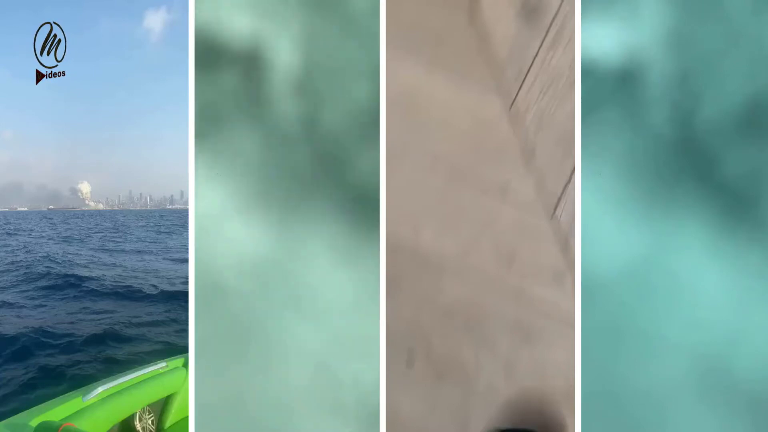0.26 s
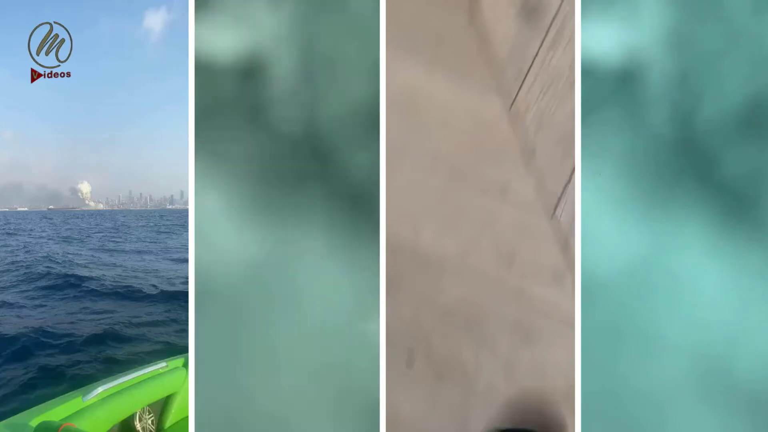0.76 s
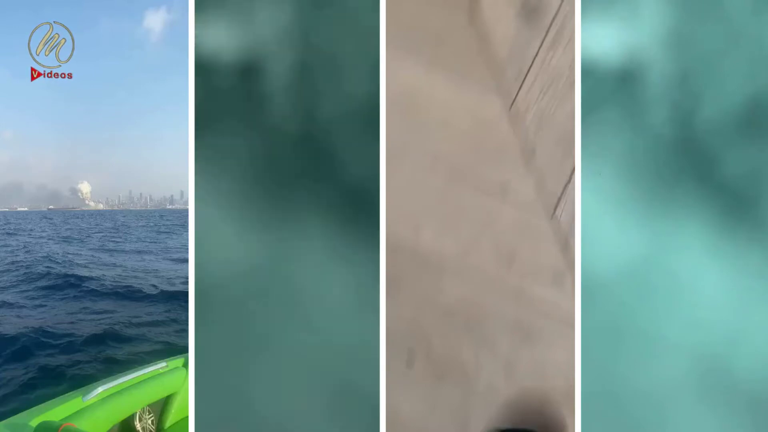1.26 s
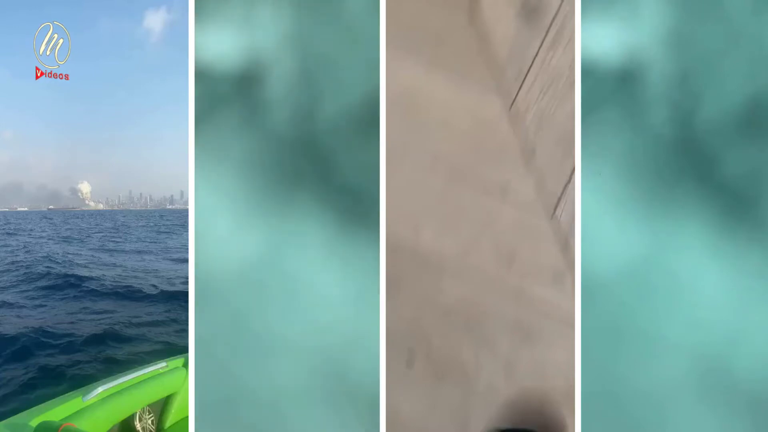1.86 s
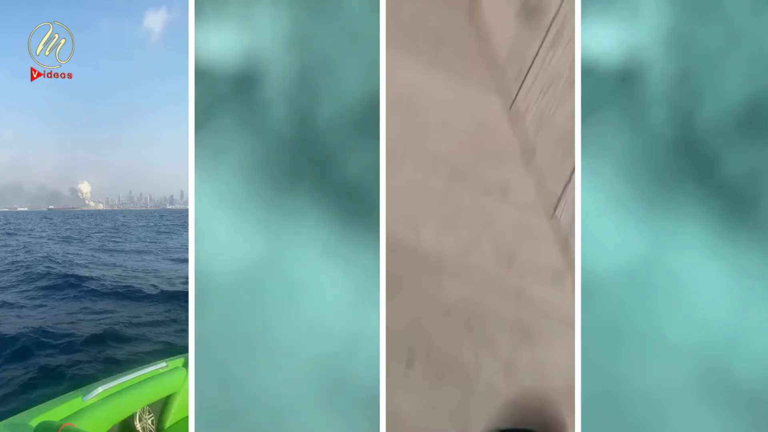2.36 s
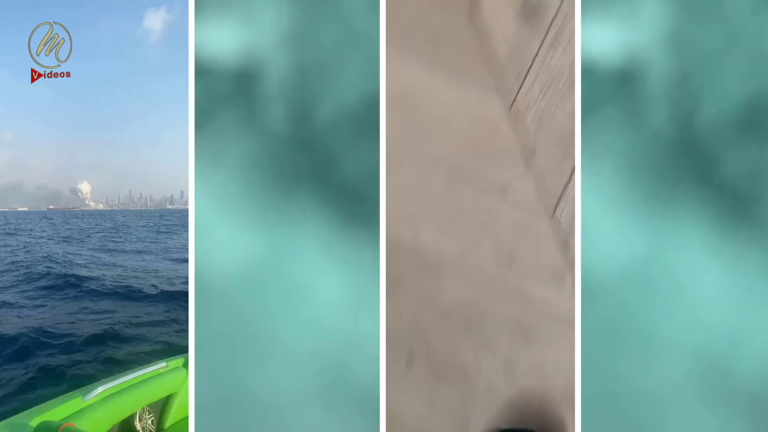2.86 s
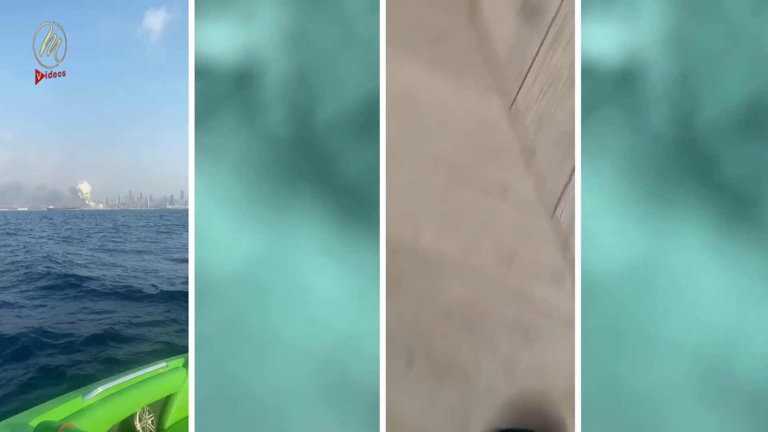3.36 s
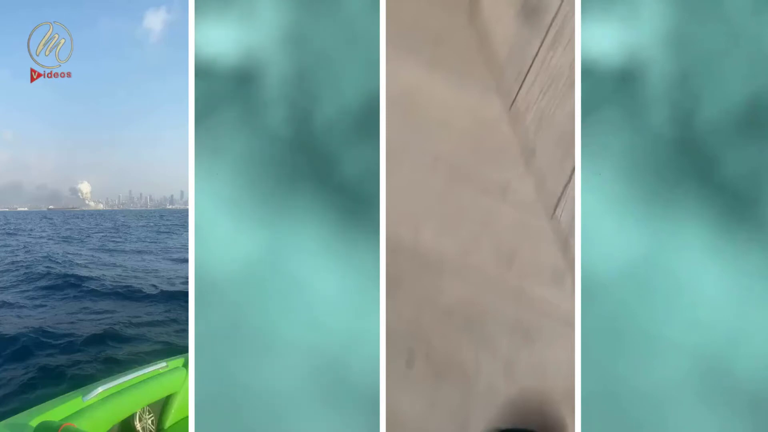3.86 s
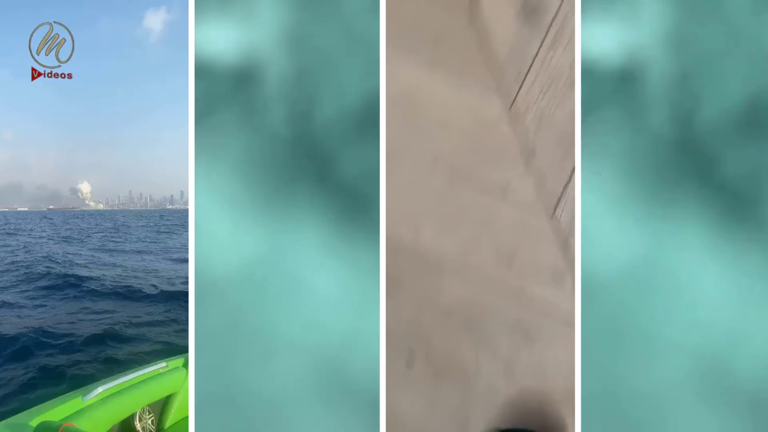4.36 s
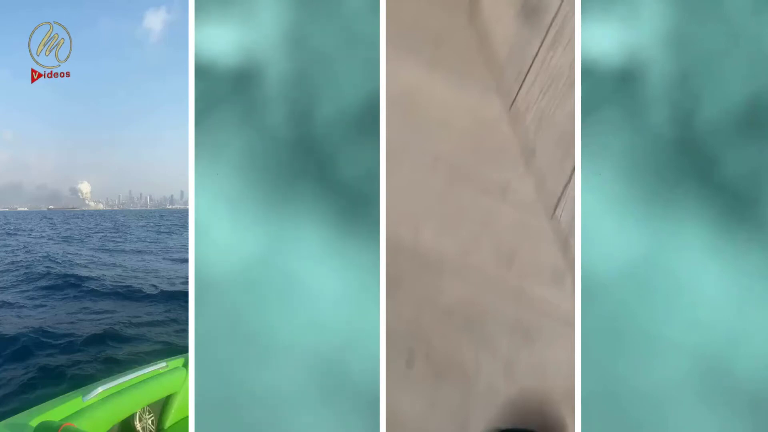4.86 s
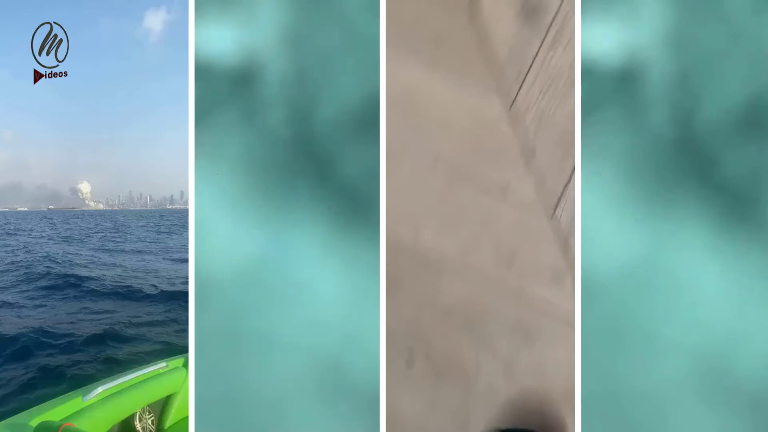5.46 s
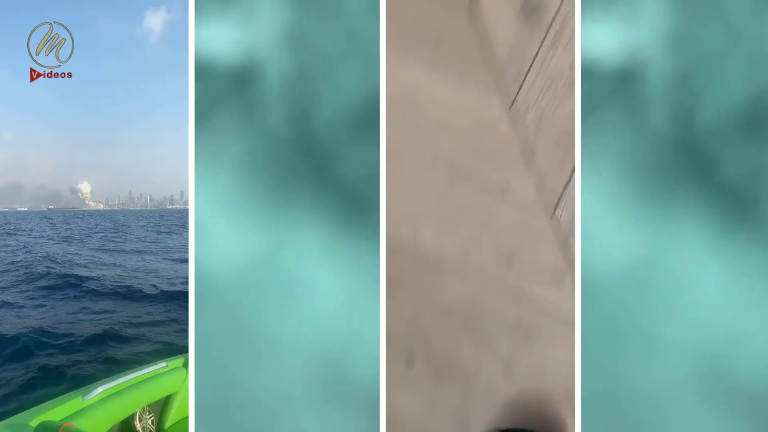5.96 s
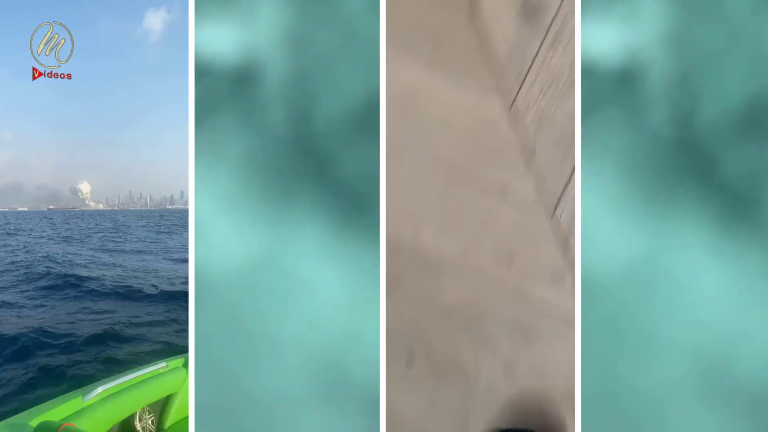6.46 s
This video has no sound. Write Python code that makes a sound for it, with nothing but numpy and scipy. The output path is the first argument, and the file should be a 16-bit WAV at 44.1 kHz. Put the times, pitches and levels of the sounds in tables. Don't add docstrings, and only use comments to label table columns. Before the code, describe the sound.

A huge distant explosion's deep rumbling roar rolls and slowly fades outdoors, with early sharp thuds, clattering debris, a faint scrape and late glass tinkle.

```python
import sys
import numpy as np
from scipy import signal
from scipy.fft import rfft, irfft, dct, next_fast_len
from scipy.io import wavfile
from scipy.ndimage import uniform_filter1d

SR = 44100
rng = np.random.default_rng(int(sys.argv[2]) if len(sys.argv) > 2 else 0)


def file_out(sig):
    cols = np.atleast_2d(sig).T
    lim = np.clip(cols, -1, 1)
    pcm = np.round(lim * 32767).astype(np.int16)
    wavfile.write(sys.argv[1], SR, pcm)


def boost_factor(decibels):
    exponent = np.asarray(decibels, float) / 20
    return 10 ** exponent


N = 296855

# pitch_hz, level_db
RUMBLE = [(12, -36), (20, -30), (29, -35), (46, -0.5), (75, 2), (244, -8.5), (289, -12), (322, -16.5),
          (438, -21.5), (496, -27), (800, -39), (1040, -42), (1760, -120)]
# pitch_hz, level_db
DIFFUSE = [(30, -40), (100, -22.5), (200, -17), (400, -7), (800, -5.5)]
# pitch_hz, level_db
ROAR = [(130, -25), (250, 1.5), (380, 0), (500, -1), (750, -8), (970, -10), (1440, -6.5), (1780, -15),
        (2100, -17), (2800, -39.5), (3600, -58)]
# pitch_hz, level_db
ROAR_APART = [(260, -39.5), (450, -4), (486, 0.5), (650, -3.5), (830, -3.5), (1510, -9.5), (2420, -20),
              (2800, -21.5), (3640, -42.5), (6160, -120)]
# pitch_hz, level_db
EARLY = [(350, -24.5), (600, -0.5), (850, 1), (1300, -9), (1800, -3.5), (2300, -5), (3200, -14),
         (4500, -29.5)]
# pitch_hz, level_db
HISS = [(1500, -28), (2300, 6), (2700, -2.5), (3300, 2), (4000, -2.5), (4350, -1.5), (4520, 2),
        (4700, -3.5), (5800, -5.5), (6600, -11.5), (8000, -31.5)]
# pitch_hz, level_db
FIZZ = [(4500, -29), (5800, -15.5), (6600, -6.5), (7400, -2), (8500, -3), (9500, -7), (10500, -6),
        (11600, -12), (12000, -65)]
# pitch_hz, level_db
KNOCK = [(300, -16.5), (700, -11.5), (1400, -2), (2200, 4), (3200, -29.5)]

# first_db, last_db, time_constant_s
SINK_RUMBLE = (-16, -27., 1.92)
SINK_ROAR = (-23, -52, 2.51)
SINK_EARLY = (-30, -70.5, 1.5)
SINK_HISS = (-34.5, -83.5, 5.11)
SINK_FIZZ = (-42, -84.5, 3.4)
# centre_s, half_length_s, lift_db
SWELLS = [(0.104, 0.12, -2.5), (0.369, 0.23, 1), (0.658, 0.063, -3), (0.776, 0.063, 0.5), (0.89, 0.022, -9),
          (1.05, 0.19, 1.5), (1.341, 0.044, -4.5), (1.486, 0.03, -4.5), (1.696, 0.13, 3),
          (2.024, 0.12, 2.5), (2.145, 0.049, -3.5), (2.305, .04, 3), (2.412, 0.042, 5), (2.46, 0.074, -2),
          (2.992, 0.06, 3), (3.078, 0.056, -0.5), (3.112, 0.018, 2), (3.273, 0.0094, -1.5),
          (3.477, 0.091, 3), (3.607, 0.013, 9), (3.722, 0.054, -0.5), (3.791, 0.044, 6.5),
          (4.037, 0.27, 4.5), (4.282, 0.05, 5), (4.484, 0.027, 6.5), (4.869, 0.084, 2), (5.664, 0.054, -3),
          (5.752, 0.088, 3), (5.953, .04, 1.5), (6.724, 0.085, 1.5)]
# centre_s, half_length_s, lift_db, extra_treble_db
WAVES = [(0.001, 0.1, 3, 1), (0.109, 0.17, -5, 18.5), (0.316, 0.1, -2, 6.5), (0.482, 0.042, 0.5, -2.5),
         (0.795, 0.02, 2.5, 2), (0.839, 0.036, -6.5, 2.5), (1.028, 0.18, 7, -4), (1.165, 0.04, 5.5, 0.5),
         (1.614, 0.11, 1.5, -8), (1.862, 0.13, 3, -12), (1.995, 0.072, 4.5, 3), (2.102, 0.072, 1.5, 7.5),
         (2.55, 0.11, -2, -5.5), (2.645, 0.17, -2, 12), (2.768, 0.082, -4.5, 1.5), (3.044, 0.42, 5, 2),
         (2.95, 0.044, 0.5, 3.5), (3.312, 0.15, 2.5, 8), (3.845, 0.2, 6.5, -5), (4.115, 0.11, 4.5, 5.5),
         (4.548, 0.13, 5, -8.5), (4.644, 0.072, 0.5, 15.5), (4.927, 0.9, 0, -5.5), (5.202, 0.034, 4, 0),
         (5.31, 0.25, -1.5, 13.5), (5.518, 0.13, 2, -1.5), (5.717, 0.037, 2, -1), (5.97, 0.08, 3, -11),
         (6.37, 0.14, 2, -3), (6.74, 0.013, 17, 7)]
TAKES_ROAR = (1, 0.022)
TAKES_HISS = (1.17, 0.46)
TAKES_FIZZ = (1, 0.7)

# start_s, level_db, pitch_hz
BOOMS = [(0.121, -7, 75.4), (0.31, -2, 78), (0.345, -12, 89), (0.376, -12, 130), (0.424, -26, 121),
         (0.462, -17.5, 113), (0.514, -16, 80), (0.68, -13.5, 59), (0.724, -7.5, 123), (0.78, -5.5, 86.4),
         (0.82, -10, 96.6), (0.883, -15, 148), (1.088, -14.5, 58), (1.619, -7, 68.6), (1.707, -11, 141),
         (2.024, -13, 61.4), (2.292, -11, 95), (2.324, -4, 112.4), (2.376, -6, 61.3), (2.55, -15, 130),
         (3.482, -32, 86), (3.574, -12, 90.5), (3.767, -11.5, 105), (3.933, -19, 118), (4.049, -11.5, 94),
         (4.27, -13.5, 60), (4.382, -13, 82), (4.478, -18.5, 85), (4.559, -20, 154), (4.659, -19, 138),
         (4.95, -24.5, 180), (5.011, -17, 117), (5.585, -18.5, 100), (5.683, -28, 154), (6.544, -25, 139.5),
         (6.687, -13.5, 83)]
# start_s, level_db, pitch_hz
THUDS = [(0.026, -3.5, 423), (0.2, -9, 306), (0.247, -30, 328), (0.281, -2, 540), (0.347, 1.5, 348),
         (0.45, -1.5, 334), (0.521, -14, 360), (0.591, -17, 355), (0.616, -4.5, 292), (0.678, -12, 305),
         (0.718, -16, 323), (0.751, -5.5, 322), (0.809, -8, 302), (0.838, -13, 560), (0.938, -32, 303.6),
         (1.011, -29, 357), (1.026, -4.5, 393), (1.146, -26, 398), (1.26, -7.5, 345.5)]
# start_s, level_db, t60_s, knock_db, fizz_db
CLATTER = [(0.024, -2, 0.024, -18, -11), (0.4448, -12, 0.029, -13, -11), (0.4934, -12.5, 0.03, 11, -11.5),
           (0.5214, -50, 0.025, 10, -33), (0.6724, -33, 0.046, 3, -13), (0.6933, -23, 0.03, 8, -20),
           (0.7165, -33, 0.015, -1, -13), (0.733, -30, 0.02, 3, -11), (0.7487, -35, 0.022, 1.5, -17),
           (0.7706, -18, 0.056, 2.5, -14), (0.817, -42, 0.017, -5, -13), (0.8395, -30, 0.046, 14, -8),
           (1.038, -39, 0.16, 3, 4.5), (1.137, -15, 0.13, 10.5, -24), (1.611, -27.5, 0.088, 15.5, -16),
           (1.9854, -38, 0.034, 2, -4), (2.297, -41, 0.099, -2, -10), (2.6154, -41, 0.079, -4, 1),
           (2.918, -37.5, 0.11, -6, -27), (3.2966, -27.5, 0.038, -4, -19), (4.1103, -56, 0.06, 8, -23),
           (4.62, -35.5, 0.053, 9, -15), (4.632, -38, 0.059, 5, -12), (5.2025, -44, 0.071, 3, -23),
           (5.252, -53, 0.22, -11, -3), (5.52, -57, 0.05, -5, 6), (5.8154, -60, 0.061, 14, -13),
           (5.857, -53, 0.06, 8, -22), (6.331, -54.5, 0.2, 6, -3), (6.6194, -58, 0.062, 10, -6)]
# start_s, level_db, pitch_hz, t60_s
CHINKS = [(.022, -30, 7050, 0.046), (.022, -32, 4200, .05), (.055, -20, 2140, .06), (.44, -32, 6450, .04),
          (.488, -33, 8020, 0.056), (.488, -31, 4340, .05), (.688, -30, 2970, .04), (.77, -29, 3020, .04),
          (1.03, -20, 724, .07), (1.985, -28, 1540, 0.068), (4.625, -46, 6050, .05),
          (1.138, -19, 1890, 0.041), (3.24, -42, 2425, 0.18), (3.975, -52, 9430, 0.15),
          (4.108, -29, 2084, 0.075), (5.205, -43, 900, 0.091), (5.201, -51, 4600, 0.044),
          (5.204, -47, 3160, 0.034), (5.53, -68, 3800, 0.15)]
# (pitch_hz, level_db)
GLASS = [
    (5.51, 0.38, -1.5, [(6110, -83), (6422, -100), (6998, -82), (7510, -97), (7725, -85), (8306, -84), (8603, -86), (8942, -90), (9114, -85), (9335, -93), (9808, -87), (10691, -99), (10977, -89), (11149, -99)]),
    (6.08, 0.11, -1.2, [(6476, -83), (6950, -95), (7843, -100), (7903, -83), (8156, -85), (8775, -103)]),
]
# time_s, level_db
SCRAPE = [
    (2.75, -86.5),
    (2.88, -52),
    (3.1, -49),
    (3.3, -57),
    (3.55, -60.5),
    (3.7, -84.5),
]

# pitch_hz, left_lead_rad, likeness (0-1)
PORTS = [(1890, 0.76, 0.94), (2650, 4.3, 0), (3564, 2.11, .5), (4323, 1.74, 1), (4600, 3.1, 0.5),
         (5000, 3.5, 0.91), (5460, 3.31, 0.79), (6100, 4.46, 0.71), (6300, 4.6, .6), (6700, 5.3, .65),
         (6950, 6.2, .96), (9500, 6.35, .94), (10480, 8.4, 0.2), (11040, 9.16, 0.9)]
# time_s, share (0-1)
FOCUS = [
    (0, 0.53),
    (.25, 0.14),
    (.32, 0.2),
    (2.8, 0.1),
    (2.88, 0.1),
    (3.269, 0.4),
    (3.33, 0),
]
# time_s, share (0-1)
OPPOSED = [
    (2.818, 0.3),
    (2.87, 0.18),
    (3.25, 0.3),
    (3.29, 0),
]
# pitch_hz, left_lead_rad
EDGE_ON = [(1890, .3), (2240, 3.6), (2580, 3.2), (3700, 3.1), (4390, 2.2), (4740, 3.1), (6200, 3.4),
           (6980, 6.2), (9910, 6.3), (11300, 9.6)]
# pitch_hz, left_over_right_db
LEAN = [(60, -0.5), (130, -1), (270, -4), (560, -1.5), (1190, -1.5), (2510, -4.5), (5290, 3), (11200, -2)]
# start_s, end_s
GAP = (.8035, .8124)

# pitch_hz, depth_db
STREAKS = [(900, 0), (1800, 2.5), (2800, 4), (4500, 4.5), (7000, 3), (11000, 3.5)]
# pitch_hz, level_db
STARVE = [(200, -36), (800, -25), (1600, -24), (2200, -16), (2700, -10), (4000, -9), (5200, -8), (6500, -7),
          (7500, -8.5), (9000, -5.5), (10300, -5), (11500, -2)]
THINNING_BANDS = [0, 96, 108, 120, 132, 144, 160, 176, 196, 216, 240, 264, 292, *range(320, 1024, 32)]
SHARP = [
    .33,
    .45,
    .5,
    .735,
    .755,
    .79,
    .825,
    .845,
    5.205,
]
# centre_s, half_length_s, depth_db
THRIFT = [
    (.13, 0.26, 4),
    (.6, 0.082, 0.5),
    (1.02, 0.22, 2),
    (1.25, 0.099, 1),
    (3.05, 0.23, 7),
]
# pitch_hz, share (ratio)
THRIFT_SHARE = [(2450, 0), (2560, 1.8), (3100, 1.4), (3700, .6), (4600, .4), (5600, 1), (6250, 1.4),
                (6300, 0)]


def evened(x):
    return x / np.sqrt(np.mean(x ** 2) + 1e-20)


def smoothed(x, width):
    return uniform_filter1d(uniform_filter1d(x, width), width)


def read(points, hz):
    f, value = np.transpose(points)
    return np.interp(np.log(hz + 1), np.log(f + 1), value)


def add(mix, s, sound):
    part = mix[..., round(s * SR):][..., :sound.shape[-1]]
    part += sound[..., :part.shape[-1]]


def bumps(rows):
    out = np.zeros((len(rows[0]) - 2, N))
    for s, half, *db in rows:
        at = slice(max(round((s - half) * SR), 0), round((s + half) * SR))
        hump = np.cos(np.pi / 2 * (np.arange(N)[at] / SR - s) / half) ** 2
        add(out, at.start / SR, np.outer(db, hump))
    return out


def level(sink, humps, takes):
    first_db, last_db, seconds = sink
    sinking_db = last_db + (first_db - last_db) * np.exp(-np.arange(N) / SR / seconds)
    return boost_factor(sinking_db + np.dot(takes, bumps(humps)))


def flutter(depth_db, seconds):
    noise = rng.standard_normal(N)
    return boost_factor(depth_db * evened(smoothed(noise, max(int(seconds * SR), 2))))


def patchy(x, depth_db, bins, frames):
    z = signal.stft(x, nperseg=512)[2]
    noise = rng.standard_normal(z.shape[-2:])
    field = uniform_filter1d(noise, max(int(bins), 1), axis=0)
    field = evened(uniform_filter1d(field, max(int(frames), 1), axis=1))
    return signal.istft(z * boost_factor(depth_db * field), nperseg=512)[1][..., :N]


def echoes(per_s, spread_db):
    arrive, sign, big = rng.random((3, N), np.float32)
    at = np.flatnonzero(arrive < per_s / SR)
    size_db = spread_db * np.minimum(-np.log(1 - big[at]), 5)
    out = np.zeros(N)
    out[at] = np.sign(sign[at] - .5) * boost_factor(size_db)
    return out


def coloured(x, *spectra):
    hz = abs(np.fft.fftfreq(16384, 1 / SR))
    gain_db = np.maximum(sum(read(s, hz) for s in spectra), -100)
    log_gain = np.log(boost_factor(gain_db))
    taps = np.fft.ifft(np.exp(np.conj(signal.hilbert(log_gain)))).real[:6000]
    return signal.oaconvolve(x, taps)[:len(x)]


def ports(alike, apart):
    return np.array([alike + apart, alike - apart])


def port_pair(x, other):
    size, t = next_fast_len(N), np.arange(N) / SR
    hz = np.fft.rfftfreq(size, 1 / SR)
    f, lead, same = np.transpose(PORTS)
    same = np.clip(np.interp(hz, f, same), 0, 1)
    left = rfft(x, size)
    turned = np.exp(-1j * np.interp(hz, f, lead)) * left
    mixed = same * turned + np.sqrt(1 - same ** 2) * rfft(other, size)
    focus = np.clip(np.interp(t, *np.transpose(FOCUS)), 0, 1)
    right = focus * irfft(turned, size)[:N] + (1 - focus) * irfft(mixed, size)[:N]
    edge_on = irfft(np.exp(-1j * np.interp(hz, *np.transpose(EDGE_ON))) * left, size)[:N]
    opposed = np.clip(np.interp(t, *np.transpose(OPPOSED)), 0, 1)
    return np.array([x, opposed * edge_on + (1 - opposed) * right])


def rattle(spectrum, per_s, spread_db):
    return port_pair(*(evened(coloured(echoes(per_s, spread_db), spectrum)) for _ in range(2)))


def hiss(waver):
    coarse = rattle(HISS, per_s=15000, spread_db=4.0) * level(SINK_HISS, WAVES, TAKES_HISS) * boost_factor(5.5)
    fine = rattle(FIZZ, per_s=13000, spread_db=3.5) * level(SINK_FIZZ, WAVES, TAKES_FIZZ) * boost_factor(0.5)
    return patchy(coarse + fine, depth_db=3.0, bins=3.5, frames=9.5) * waver


def scrape(hz=4420., width_hz=200.):
    t = np.arange(N) / SR
    grit = uniform_filter1d(rng.standard_normal((2, N)), max(int(SR / width_hz), 2), axis=1)
    tone = evened(grit[0] * np.cos(2 * np.pi * hz * t) + grit[1] * np.sin(2 * np.pi * hz * t))
    return tone * boost_factor(np.interp(t, *np.transpose(SCRAPE))) * [[1], [-.6]]


def shards():
    out, t = np.zeros(N), np.arange(SR // 2) / SR
    for s, db, hz, t60 in CHINKS:
        decay = boost_factor(db - 60 * t / max(t60, .02))
        add(out, s, decay * np.sin(2 * np.pi * hz * t) * (1 - np.exp(-t / 0.0031)))
    for s, length, db, partials in GLASS:
        u = np.arange(int(length * SR)) / SR
        edges = signal.windows.tukey(len(u), .25)
        for hz, line_db in partials:
            touch = evened(smoothed(rng.standard_normal(SR), 900))[:len(u)]
            fade = boost_factor(db + line_db + 12.5 - 7.0 * u / length)
            add(out, s, fade * touch * np.sin(2 * np.pi * hz * u) * edges)
    return out * boost_factor([[1.2], [-1.2]])


def clatter():
    grit = [rattle(colour, per_s=5000, spread_db=4.5) for colour in (HISS, KNOCK, FIZZ)]
    shape, t = np.zeros((3, N)), np.arange(SR // 2) / SR
    for s, db, t60, knock_db, fizz_db in CLATTER:
        parts_db = np.array([[-6.], [knock_db - 15.5], [fizz_db - 5.5]])
        decay = boost_factor(db + parts_db - 60 * t / max(t60, .02))
        add(shape, s, decay * (1 - np.exp(-t / 0.0015)))
    return sum(g * s for g, s in zip(grit, shape))


def thuds():
    out = np.zeros(N)
    for s, db, hz in THUDS:
        turns = np.arange(int(5 * SR / hz)) * hz / SR
        shape = (1 - np.exp(-turns / 0.24)) * np.exp(-turns / 0.71)
        add(out, s, boost_factor(db - 2.0) * np.sin(2 * np.pi * turns) * shape)
    return out * boost_factor([[-1.], [1.]])


def booms():
    out = np.zeros(N)
    for s, db, hz in BOOMS:
        turns = np.arange(int(4 * SR / hz)) * hz / SR
        shape = 5.3 * turns / 0.39 * np.exp(-turns / 0.61)
        add(out, s, boost_factor(db - 12.5) * np.sin(2 * np.pi * turns) * shape)
    return out


def early(waver):
    alike, apart = (evened(coloured(echoes(per_s=4000, spread_db=3.5), EARLY)) for _ in range(2))
    return ports(alike, apart * boost_factor(-2.0)) * level(SINK_EARLY, WAVES, (.8, .1)) * waver


def roar(waver):
    alike = evened(coloured(echoes(per_s=6000, spread_db=2.5), ROAR))
    apart = evened(coloured(echoes(per_s=5000, spread_db=7.0), ROAR_APART)) * boost_factor(-4.5)
    both = patchy(ports(alike, apart), depth_db=2.0, bins=4.5, frames=12.5)
    return both * level(SINK_ROAR, WAVES, TAKES_ROAR) * boost_factor(2.0) * waver ** 1.7


def rumble():
    raw = coloured(echoes(per_s=900, spread_db=1.5), RUMBLE)
    apart = coloured(echoes(per_s=1200, spread_db=2.0), RUMBLE, DIFFUSE)
    slow = smoothed(raw ** 2, 3000) ** 0.36 * np.std(raw) ** 0.31
    late = np.roll(raw, 4)
    shared = np.array([late, raw]) / slow
    unlike = np.array([apart, -apart]) / np.std(raw)
    return (shared + unlike) * level(SINK_RUMBLE, SWELLS, [1])


def scene():
    waver = flutter(depth_db=0.66, seconds=0.02)
    echoing = rumble() + roar(waver) + early(waver) + booms() + thuds()
    return echoing + hiss(waver) + clatter() + shards() + scrape()


def thinned(x):
    lead, frames, lines = 2048 - 449, N // 1024 + 3, 1024
    pair = np.pad([x[0] + x[1], x[0] - x[1]], ((0, 0), (lead, 4096))) / 2
    n, k = np.arange(2048), np.arange(lines)
    starts = 1024 * np.arange(frames)
    hz, t = (k + .5) * SR / 2048, (starts + 1024 - lead) / SR
    window = signal.windows.kaiser_bessel_derived(2048, 4 * np.pi)
    a, b, c, d = np.split(pair[:, starts[:, None] + n] * window, 4, axis=2)
    z = dct(np.dstack([-c[..., ::-1] - d, a - b[..., ::-1]]), 4, norm="ortho")
    depth_db = np.maximum(read(STREAKS, hz), 0)
    noise = uniform_filter1d(rng.standard_normal(z.shape[1:]), size=3, axis=0)
    streak = evened(uniform_filter1d(noise, size=3, axis=1))
    sharp = (abs(t - np.array(SHARP)[:, None]).min(0) < 512 / SR)[:, None]
    z = z * boost_factor((depth_db * streak - depth_db ** 2 * np.log(10) / 20) * ~sharp)
    power = uniform_filter1d(z ** 2, size=2, axis=1)
    own = np.searchsorted(THINNING_BANDS, k, "right") - 1
    blocks = np.add.reduceat(power, THINNING_BANDS, axis=2)
    fickle_db = 2. * evened(uniform_filter1d(rng.standard_normal(blocks.shape[1:]), size=3, axis=0))
    busy_db = np.interp(t * SR, np.arange(N), bumps(THRIFT)[0])[:, None] * read(THRIFT_SHARE, hz)
    bias_db = np.array([busy_db, -4. * (hz < 6280) + 0 * busy_db])
    empty_db = -8. + fickle_db + bias_db[..., THINNING_BANDS[1:] + [-1]] / 2
    full = (blocks > blocks.sum(0) * boost_factor(2 * empty_db))[..., own] | (hz < 4640)
    full = full & (hz < np.array([10950, SR])[:, None, None])
    band = np.sqrt(abs(uniform_filter1d(power.sum(0), size=28, axis=1)) + 1e-20)
    step = band * boost_factor(read(STARVE, hz) + fickle_db[:, own] + bias_db) / .6
    stepped = np.sign(z) * np.floor(abs(z) / step + .4) * step * full
    z = np.where(sharp, z, stepped)
    p, q = np.split(dct(z * (hz < 12000), 4, norm="ortho"), 2, axis=2)
    halves = np.dstack([q, -q[..., ::-1], -p[..., ::-1], -p]) * window
    halves = halves.reshape(2, frames, 2, 1024)
    whole = (halves[:, 1:, 0] + halves[:, :-1, 1]).reshape(2, -1)
    return ports(*whole[:, lead - 1024:][:, :N])


def roll_off(x):
    return signal.sosfilt(signal.butter(12, 11850, fs=SR, output="sos"), x)


def record(dry):
    size, t = next_fast_len(N), np.arange(N) / SR
    lean = boost_factor(np.array([[.5], [-.5]]) * read(LEAN, np.fft.rfftfreq(size, 1 / SR)))
    heard = irfft(rfft(dry, size) * lean, size)[:, :N]
    overloaded = 1.385 * np.tanh(heard / 1.184)
    kept = np.clip(np.maximum((GAP[0] - t) / 0.001, (t - GAP[1]) / 0.00092), .012, 1)
    return roll_off(thinned(overloaded * kept))


dry = scene()
out = record(dry)
file_out(out)
```